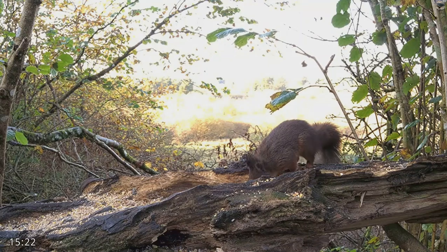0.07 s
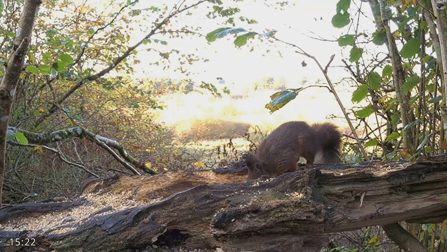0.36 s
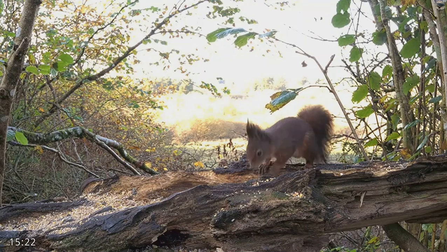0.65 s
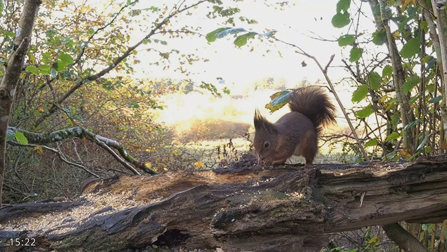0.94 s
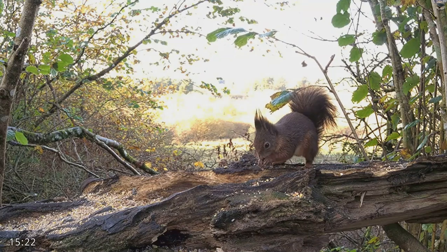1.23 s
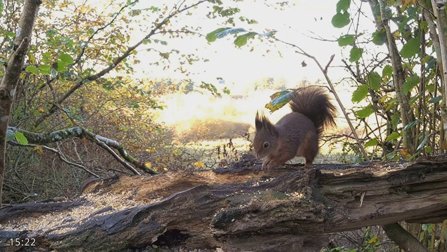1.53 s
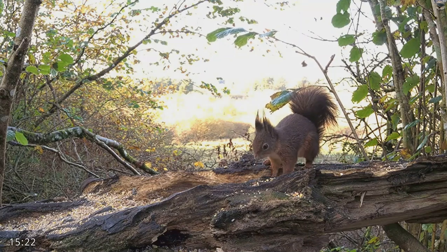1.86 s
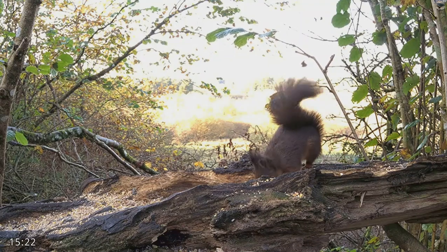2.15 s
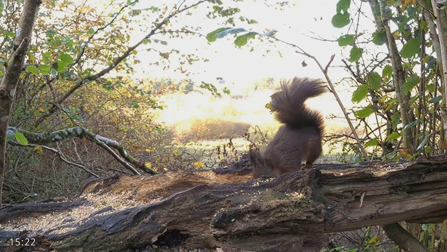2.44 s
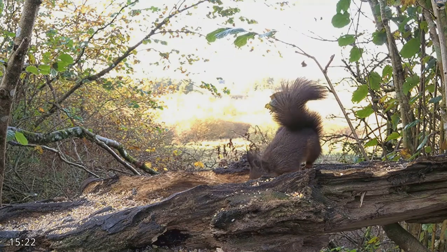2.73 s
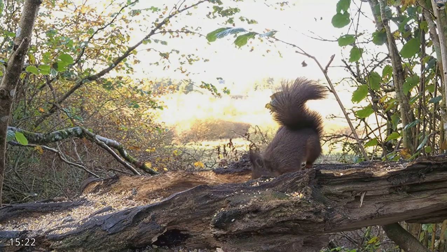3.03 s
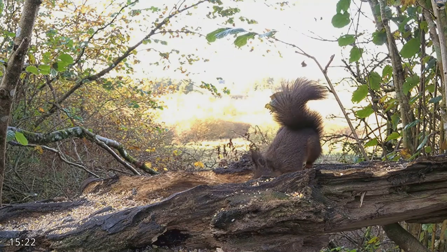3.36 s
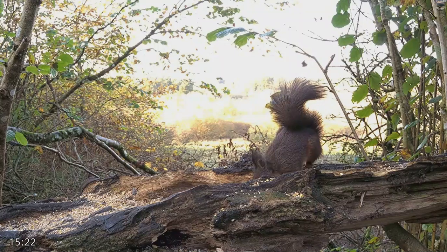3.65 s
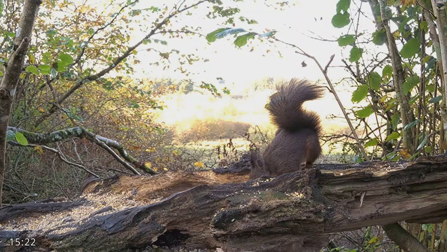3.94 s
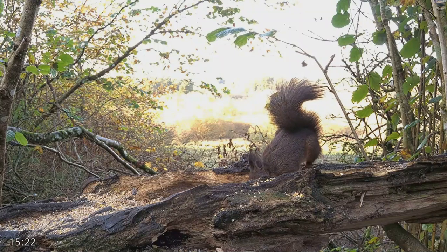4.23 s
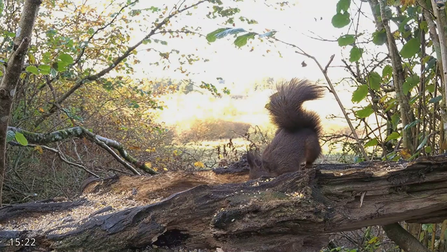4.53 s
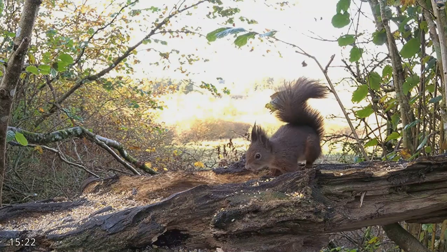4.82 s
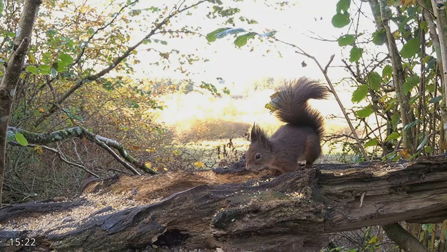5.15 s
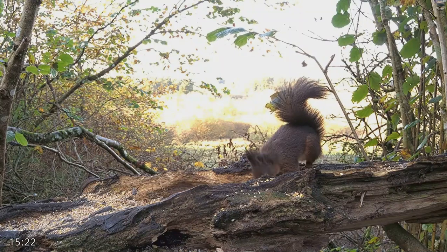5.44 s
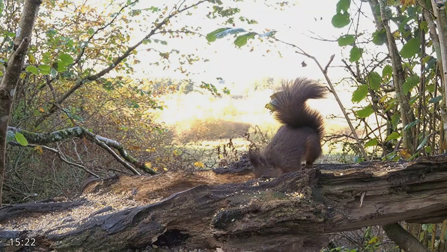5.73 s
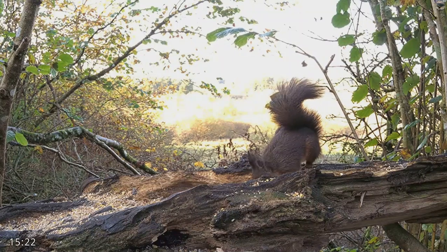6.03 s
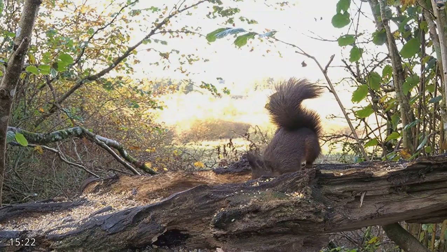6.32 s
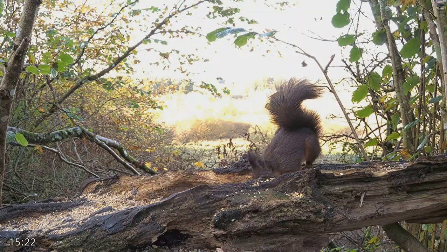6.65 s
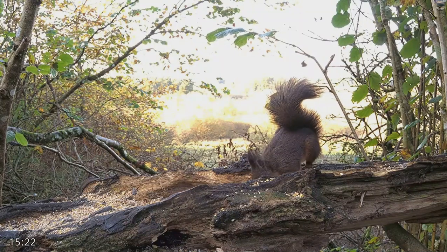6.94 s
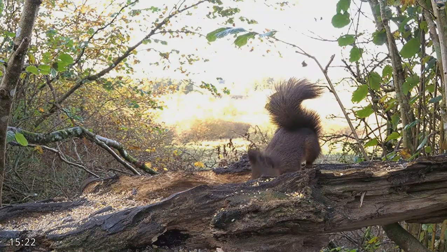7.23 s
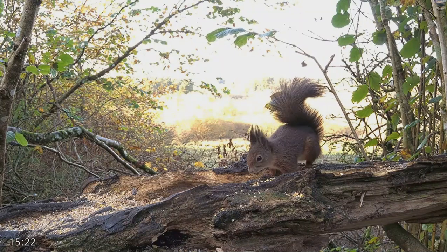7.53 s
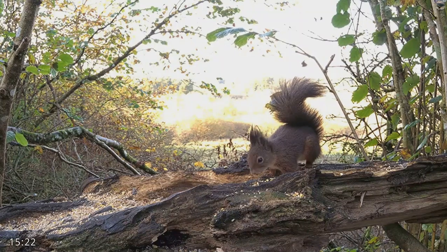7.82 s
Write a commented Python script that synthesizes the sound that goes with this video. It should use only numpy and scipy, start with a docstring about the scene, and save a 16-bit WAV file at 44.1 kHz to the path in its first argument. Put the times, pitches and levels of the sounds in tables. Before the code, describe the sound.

In quiet woodland, a squirrel nibbles seeds on a log, making small, irregular dry cracks and scratches. After about two seconds a small bird flutters in close to the microphone, with quick wingbeats and a sharp wing clap. It gives loud, thin, high chirps that grow fainter and further apart as the cracking continues. Distant birds whistle softly over a faint hiss, hum and low rumble.

```python
"""In quiet woodland, a squirrel cracks seed husks and scratches the bark of a rotten log.
A bird flutters in close, pushing air with each wingbeat, and brakes with a clap of its wings.
It gives thin, high chirps that grow fainter. Other birds whistle far off among the trees.
Mains hum, hiss and a low rumble lie under everything."""
import sys
import numpy as np
from scipy import signal
from scipy.fft import rfft, irfft, next_fast_len
from scipy.io import wavfile
from scipy.ndimage import map_coordinates

SR = 44100
rng = np.random.default_rng(int(sys.argv[2]) if len(sys.argv) > 2 else 0)


def bounce(signal):
    """Save signal as a 16-bit WAV file at the path given by the first command-line argument."""
    frames = np.transpose(np.atleast_2d(signal))
    limited = np.clip(frames, -1, 1)
    pcm = np.round(limited * 32767).astype(np.int16)
    wavfile.write(sys.argv[1], SR, pcm)


N = 347508
TOP_HZ = 15900
TIME = np.arange(N) / SR
AROUND = np.arange(-SR // 20, SR // 20) / SR  # 0.1 s of time, with zero in the middle


def amp(db):
    """Turn decibels into a number to multiply by."""
    return 10 ** (np.asarray(db) / 20)

def unit(x):
    """Scale a sound to an average (rms) strength of 1."""
    return x / np.sqrt(np.mean(x ** 2) + 1e-20)

def wobble(rate, size=N):
    """A smooth random curve that passes through `rate` new values a second."""
    points = rng.standard_normal(int(size * rate / SR) + 4)
    return map_coordinates(points, [np.arange(size) * rate / SR])

def curve(points):
    """Join (time, value) points with straight lines."""
    return np.interp(TIME, *np.transpose(points))

def swells(rows):
    """Smooth rises and falls in loudness, one for each (time, level, half length)."""
    return sum(amp(db) * np.exp(-((TIME - s) / length) ** 2) for s, db, length in rows)

def coloured(x, points):
    """Turn the lows and highs of a sound up or down along (frequency, level) points."""
    size = next_fast_len(N + 8192)
    hz, db = np.transpose(points)
    gain = amp(np.interp(np.log(np.fft.rfftfreq(size, 1 / SR) + 1), np.log(hz), db))
    return irfft(rfft(x, size) * gain, size)[:N]

def noise(points):
    """Noise of strength 1 with the given tone colour."""
    return unit(coloured(rng.standard_normal(N), points))

def grains(colour, per_s, spread_db, t60):
    """A shower of tiny random ticks. Here and below, t60 is the seconds taken to fade by 60 dB."""
    count = int(per_s * N / SR)
    when, pitch = rng.random((2, count, 1))
    k = np.arange(SR // 400)
    sizes = amp(spread_db * rng.standard_normal((count, 1)))
    ticks = sizes * amp(-60 * k / SR / t60) * np.sin(2 * np.pi * TOP_HZ * pitch * k / SR)
    places = (when * N).astype(int) + k
    return unit(coloured(np.bincount(places.ravel(), ticks.ravel(), N)[:N], colour))

def burst(shape, db):
    """Give a short sound as much energy as 0.01 s of steady sound at this level."""
    return amp(db) * shape * np.sqrt(0.01 * SR / np.sum(shape ** 2))

def add(track, s, sound):
    """Mix a sound into the track, starting at s seconds."""
    part = track[max(round(s * SR), 0):][:len(sound)]
    part += sound[:len(part)]

def echoes(x, t60, onset_s=0.00035):
    """Trunks and leaves bounce a sound back as a fading blur."""
    t = np.arange(SR) / SR
    tail = rng.standard_normal(SR) * amp(-60 * t / t60) * (1 - np.exp(-t / onset_s))
    return signal.fftconvolve(x, tail / np.linalg.norm(tail))[:N]


# The tones in the hum: (multiple of the mains frequency, level [dB])
HUM_TONES = [(1, -66), (2, -79.5), (3, -55), (4, -76.5), (5, -67.5), (7, -77.5), (9, -81), (17, -80.5),
             (19, -83), (23, -81), (25, -78), (27, -80), (37, -82)]
# Tone colours of the hiss and the rumble: (frequency [Hz], relative level [dB])
AIR_COLOUR = [(250, -29), (400, -16.5), (580, -6.5), (800, 0), (1030, -11.5), (1300, -3.5), (1900, 0.5),
              (2700, -3.5), (3700, -0.5), (5400, -14), (8000, -7), (11500, -8), (14000, -12.5),
              (15800, -21.5)]
RUMBLE_COLOUR = [(20, -5), (70, -2.5), (110, -3), (200, 2.5), (290, -4.5), (420, -13.5), (700, -32)]
def background(mains_hz=50.02, air_db=-61, rumble_db=-65):
    """Steady electrical hum, the hiss of the open air and a distant rumble."""
    phase = 2 * np.pi * mains_hz * TIME
    hum = sum(np.sqrt(2) * amp(db) * np.sin(k * phase + 2 * np.pi * rng.random()) for k, db in HUM_TONES)
    hiss = amp(air_db + 0.36 * wobble(3.2)) * noise(AIR_COLOUR)
    rumble = amp(rumble_db + 0.604 * wobble(2.2)) * noise(RUMBLE_COLOUR)
    return hum + hiss + rumble


def whistles(notes, trill_hz=75):
    """Thin sliding notes that swell, waver and fade; the higher they are, the more they trill."""
    out = np.zeros(N)
    for s, length, start_hz, end_hz, db in notes:
        u = np.linspace(0, 1, int(length * SR))  # 0 at the start of the note, 1 at its end
        trill = 0.031 * (start_hz / 9000) ** 4 * np.sin(2 * np.pi * trill_hz * length * u)
        pitch = (start_hz + (end_hz - start_hz) * u) * (1 + trill + 0.008 * wobble(201, len(u)))
        gain = amp(db + 1.5 * wobble(100, len(u))) * np.abs(np.sin(np.pi * u)) ** 0.59
        add(out, s, gain * np.sin(2 * np.pi * np.cumsum(pitch) / SR))
    return out

# Single calls: (time [s], length [s], start pitch [Hz], end pitch [Hz], relative level [dB])
FAR_CALLS = [(0.02, 0.086, 4070, 3570, -58.5), (4.195, 0.03, 2570, 2260, -57),
             (4.42, 0.048, 3100, 3070, -58), (4.717, 0.065, 9130, 8300, -48),
             (5.88, .077, 7820, 9140, -51.5), (7.64, 0.076, 9140, 8400, -53.5)]
def far_calls():
    """The calls of far birds arrive mostly as echoes from the trees."""
    calls = whistles(FAR_CALLS)
    return amp(-9) * calls + echoes(calls, t60=0.42, onset_s=0.0037)

# Phrases of song: (time [s], first pitch [Hz], relative level [dB])
FAR_PHRASES = [(3.039, 4120, -53), (5.249, 4310, -59), (7.165, 4305, -59)]
def far_song(note_s=0.096, spacing_s=0.2, sag_hz=61, step_hz=85.6, step_db=3):
    """A far bird sings three notes, each lower and softer than the last; they linger in the trees."""
    song = whistles((s + k * spacing_s, note_s, hz - k * step_hz, hz - k * step_hz - sag_hz,
                     db - k * step_db) for s, hz, db in FAR_PHRASES for k in range(3))
    return amp(-2.5) * song + amp(-4) * echoes(song, t60=0.56, onset_s=0.004)


# The squirrel shifting its weight: (time [s], level [dB])
SHUFFLE_LEVELS = [(0, -81), (1.0, -77), (1.1, -63.5), (1.3, -65), (1.45, -78), (2.0, -75), (2.4, -64),
                  (3.2, -80.5), (7.88, -100)]
# Tone colour of the log: (frequency [Hz], relative level [dB])
LOG_COLOUR = [(70, -30), (130, -7.5), (210, 4), (300, -7), (500, -23), (1000, -60)]
def shuffle():
    """Soft, hollow bumps from the log under the squirrel's feet."""
    return amp(curve(SHUFFLE_LEVELS) + 2.6 * wobble(25)) * noise(LOG_COLOUR)

# Spells of rummaging: (time [s], level [dB], half length [s])
RUMMAGE_SPELLS = [(.42, -69, .06), (1.25, -66.5, 0.15), (2.15, -64.5, .45), (5.05, -77, 0.18),
                  (7.48, -67, 0.064)]
# Tone colour of bark crumbs: (frequency [Hz], relative level [dB])
CRUMB_COLOUR = [(600, -14), (1300, -5.5), (1900, 0), (2700, -3), (3600, 3.5), (5500, -4), (8500, -3.5),
                (12500, -6.5), (16000, -14.5)]
def rummage(idle_db=-71):
    """Paws and nose stir crumbs of bark: tiny ticks of very uneven size."""
    ticks = grains(CRUMB_COLOUR, per_s=1500, spread_db=4.5, t60=0.0044)
    return (amp(idle_db) + swells(RUMMAGE_SPELLS)) * ticks

# Claw strokes: (time [s], level [dB], half length [s])
CLAW_STROKES = [(0.383, -64, 0.022), (4.902, -57.5, 0.04), (6.51, -60, 0.04), (7.405, -59, 0.017),
                (7.495, -59.5, 0.0096)]
# Bright tone colour of scrapes and of snapping husks: (frequency [Hz], relative level [dB])
SNAP_COLOUR = [(3000, -11), (5000, -15), (6500, 1.5), (8500, 6), (10000, -2), (11500, -15), (16000, -26)]
def scrapes(grit_db=4):
    """Claws drag over bark in brief, gritty swells."""
    return swells(CLAW_STROKES) * unit(noise(SNAP_COLOUR) * amp(grit_db * wobble(450)))

# Spells of gnawing: (time [s], length [s], bite rate [1/s], relative level [dB])
GNAW_SPELLS = [(1.04, 0.68, 13.2, -67), (1.831, 0.61, 11.6, -73), (5.07, 0.35, 16, -70)]
def gnawing(spread_db=3, unevenness=0.25, husk_hz=3600):
    """List light, dull bites in loosely regular runs, as extra rows for cracks()."""
    bites = []
    balance_db = np.array([0, 3, -4, -4])  # knock, ring, snap, click
    for start, length, rate, db in GNAW_SPELLS:
        for s in start + np.arange(0, length, 1 / rate):
            late, sharp = rng.standard_normal(2)
            levels = db + balance_db + spread_db * rng.standard_normal(4)
            bites.append((s + unevenness * late / rate, *levels, husk_hz * np.exp(0.09 * sharp)))
    return bites

# The tones of a husk: (multiple of its pitch, relative level [dB], time to fade by 60 dB [s])
HUSK_TONES = [(1, -3, 0.01), (1.22, -17, 0.004)]
def husk_ring(hz, t, attack_s=0.00018, roughness=0.48):
    """The dry, unsteady ring of a splitting husk."""
    tones = 0
    for ratio, db, t60 in HUSK_TONES:
        phase = 2 * np.pi * hz * ratio * t + roughness * wobble(2250, len(t))
        tones += amp(db - 60 * t / t60) * np.sin(phase)
    return tones * (1 - np.exp(-(t / attack_s) ** 2))

# Husks cracking and claws on bark, with the relative level of each part:
# (time [s], wood knock [dB], husk ring [dB], snap [dB], tooth click [dB], husk pitch [Hz])
HUSK_CRACKS = [(0.4298, -74, -51, -58, -51, 3704), (0.4357, -72, -53, -55, -63, 4260),
               (0.5491, -66.0, -77, -72.0, -66, 3290), (0.7397, -62.5, -57, -65, -72.0, 4370),
               (1.0266, -55, -63, -68, -74.5, 3320), (1.2866, -67, -56, -55, -68, 3550),
               (1.2919, -72, -50, -56, -67, 3770), (1.3215, -69, -57, -67.0, -62.5, 3350),
               (1.6546, -70, -74, -72, -58.5, 3620), (1.7541, -71, -53, -60.5, -67.0, 3880),
               (1.7719, -72.5, -50.5, -64, -73.0, 3900), (1.791, -57.5, -55, -57, -62, 4280),
               (1.9016, -52, -55, -69, -63.0, 3400), (1.9361, -69, -55.5, -57, -58, 3300),
               (1.9685, -64.0, -54, -56, -64, 4200), (1.9735, -70, -55.5, -68, -74.0, 4030),
               (2.0128, -77, -64, -59, -64, 4310), (2.0943, -72.5, -58, -56, -69, 3170),
               (2.1331, -60, -48.5, -51, -71, 4250), (2.1845, -68.0, -64, -62, -71.0, 3620),
               (3.585, -71.5, -63.5, -56, -63.5, 4420), (3.8474, -59, -55, -50, -66.5, 3260),
               (3.9799, -79, -55, -52, -55, 4266), (4.039, -70, -55.5, -71, -57, 3520),
               (4.2152, -72.5, -61, -50.5, -68, 4330), (4.2763, -75, -59, -59, -64.5, 3750),
               (4.321, -75, -61, -50.5, -55, 4600), (4.4162, -68, -75, -55.5, -70.0, 4100),
               (4.6933, -63, -61, -65, -72.5, 4670), (4.7451, -62, -56, -63, -73.0, 4400),
               (4.8016, -65.0, -53, -58, -63.0, 4530), (4.8605, -62, -56, -72.5, -69.5, 4540),
               (4.875, -54.5, -58, -56, -62.0, 3200), (4.9418, -74.5, -56.5, -59, -47.5, 3520),
               (5.0253, -68.5, -74, -64, -51.5, 3400), (5.0473, -67, -67, -66, -57.5, 3440),
               (5.0506, -63, -47, -59, -57, 3500), (5.1053, -68.5, -56, -61.5, -70, 3460),
               (5.1327, -59, -56.5, -67, -69.5, 3550), (5.1432, -63, -57, -62, -73.5, 3380),
               (5.1723, -73.0, -72.5, -73.0, -61, 3240), (5.1901, -75, -56.5, -69, -65, 3660),
               (5.2711, -70, -61, -68, -53.0, 3290), (5.2739, -59.0, -51.5, -74, -70, 3510),
               (5.3787, -62, -63, -60, -60.0, 3470), (5.4036, -60, -57.5, -72.5, -66, 3450),
               (5.4152, -72.5, -66, -70, -62.5, 3700), (5.814, -65, -55, -46.5, -61.0, 4310),
               (5.8787, -73.5, -53.5, -58.5, -72.5, 4580), (5.9672, -67, -55, -58, -73.0, 4480),
               (6.1782, -56, -57, -67.5, -76.0, 3640), (6.2344, -72, -61, -64.5, -76.5, 4350),
               (6.4656, -66.0, -59, -50, -53, 4630), (6.5372, -72.5, -64.5, -49.5, -56, 4550),
               (6.5975, -59, -60, -49.5, -57, 4630), (6.8644, -64, -68.0, -48, -57, 4630),
               (6.8968, -69, -74.5, -60, -58, 3010), (6.9872, -67, -53.5, -64, -71, 3340),
               (7.0566, -68, -43.5, -69, -67.5, 3486), (7.309, -64.5, -57.5, -75.0, -75.0, 3340),
               (7.3925, -61.5, -62, -49.5, -58.5, 4280), (7.4196, -78, -75.0, -53, -53, 4220),
               (7.4243, -72.5, -60, -60, -59, 4260), (7.4688, -52.5, -62, -65.0, -54, 3400),
               (7.5, -64, -57.5, -65, -66.5, 3710)]
# Tone colours of the knock and the click: (frequency [Hz], relative level [dB])
WOOD_COLOUR = [(500, -28), (1000, -13), (1400, -13), (2000, 5.5), (2600, -7), (3500, -27)]
TOOTH_COLOUR = [(7000, -33), (9500, -2), (10600, 2), (12300, 0.5), (13500, -16), (16000, -14.5)]
def cracks(attack_s=0.00063, creak_s=0.002, crumble_t60=0.098):
    """A husk creaks under the teeth, splits with a click, snap and ring, knocks the wood and crumbles."""
    out = np.zeros(N)
    t = np.arange(SR // 25) / SR
    wood, snap, teeth = noise(WOOD_COLOUR), noise(SNAP_COLOUR), noise(TOOTH_COLOUR)
    for s, knock_db, ring_db, snap_db, click_db, hz in list(HUSK_CRACKS) + gnawing():
        crumbs = amp(-26 - 60 * t / crumble_t60 + 5 * wobble(500, len(t)))
        add(out, s, burst(husk_ring(hz, t), ring_db + 0.4))
        creak = np.sin(2 * np.pi * hz * t + wobble(3000, len(t))) * np.exp(-t[::-1] / creak_s)
        add(out, s - t[-1], burst(creak, ring_db - 8))  # ends just as the husk splits
        parts = (wood, knock_db - 1, 0.012), (snap, snap_db, 0.008), (teeth, click_db - 1, 0.006)
        for source, db, t60 in parts:
            fade = (amp(-60 * t / t60) + crumbs) * (1 - np.exp(-t / attack_s))
            add(out, s, burst(source[round(s * SR):][:len(t)] * fade, db))
    return out

def splinters(count=3, scatter_s=0.013, t60=0.0026):
    """After each listed crack, a few splinters break away with tiny dry ticks."""
    out = np.zeros(N)
    t = np.arange(SR // 100) / SR
    for s, _, ring_db, _, _, hz in HUSK_CRACKS:
        for late, hard, sharp in rng.standard_normal((count, 3)):
            tick = np.sin(2 * np.pi * hz * np.exp(0.18 * sharp) * t) * t * amp(-60 * t / t60)
            add(out, s + 0.0033 + scatter_s * abs(late), burst(tick, ring_db - 17 + 3 * hard))
    return out


def shove(hz, width_s, glide=16, roughness=0.35):
    """A shove of air rises in pitch as the wing gathers speed, and dies more slowly than it comes."""
    width = width_s * np.where(AROUND < 0, 0.7, 1.25)
    phase = 2 * np.pi * hz * AROUND * (1 + glide * AROUND) + roughness * wobble(250, len(AROUND))
    return np.sin(phase) * np.exp(-(AROUND / width) ** 2)

PUFF_LAG_S = 0.009  # after the thump
# The bird flies in, brakes and settles: (time [s], thump [dB], puff [dB], feather swish [dB])
WINGBEATS = [(2.356, -70, -64, -55), (2.395, -53, -55, -55), (2.443, -50, -47, -44), (2.490, -51, -41, -42),
             (2.535, -46, -35, -42), (2.580, -46, -36, -42), (2.628, -41, -38, -44), (2.675, -37, -38, -44),
             (2.723, -37, -46, -53), (2.770, -40, -56, -54), (2.817, -42, -50, -53), (2.865, -44, -53, -56),
             (2.910, -47, -58, -59), (2.958, -46.5, -60, -60), (3.006, -47, -57, -62),
             (3.053, -48, -58, -67), (3.098, -51, -63, -70), (3.148, -54, -66, -70)]
def downstrokes():
    """Each downstroke of the wings makes a low thump, then a hollow puff."""
    out = np.zeros(N)
    for s, thump_db, puff_db, _ in WINGBEATS:
        add(out, s + AROUND[0], amp(thump_db) * shove(hz=225, width_s=0.0055))
        add(out, s + AROUND[0] + PUFF_LAG_S, amp(puff_db) * shove(hz=500, width_s=0.0046))
    return out

# Tone colour of swirling air: (frequency [Hz], relative level [dB])
SWIRL_COLOUR = [(50, -26), (110, -3), (220, 4), (380, -6), (560, -13), (800, -9), (1200, -30)]
def swirls(width_s=0.011):
    """Air swirls off the wings in a short, low rush after each thump."""
    gain = swells((s + PUFF_LAG_S, thump_db - 11, width_s) for s, thump_db, _, _ in WINGBEATS)
    return gain * noise(SWIRL_COLOUR)

# Air rushing through the spread feathers: (time [s], level [dB])
RUSH_LEVELS = [(2.25, -92), (2.38, -61), (2.55, -55.5), (2.72, -51), (2.9, -58), (3.05, -63.5), (3.25, -73)]
# Tone colour of feathers: (frequency [Hz], relative level [dB])
FEATHER_COLOUR = [(250, -13), (550, -0.5), (950, -9), (1700, -4), (2600, -9.5), (3700, 0.5), (5500, -11.5),
                  (10000, -5.5), (15000, -24)]
def feathers(lag_s=0.0089, width_s=0.011):
    """Feathers hiss in the rushing air, and swish and rub on every beat."""
    gain = amp(curve(RUSH_LEVELS))
    for s, _, _, db in WINGBEATS:
        add(gain, s + AROUND[0] + lag_s, amp(db) / np.cosh(2 * AROUND / width_s) ** 0.73)
    rustle = grains(FEATHER_COLOUR, per_s=3000, spread_db=5.5, t60=0.003)
    hiss = noise(FEATHER_COLOUR) * amp(2.5 * wobble(400))
    return gain * unit(hiss + amp(2) * rustle)

# The whirr drops as the bird slows: (time [s], level [dB], pitch [Hz])
WHIRR_PATH = [(2.3, -84, 1850), (2.365, -61.5, 1793), (2.42, -55, 1755), (2.51, -56, 1712),
              (2.6, -55.5, 1560), (2.7, -51, 1450), (2.78, -75, 1399)]
def whirr(width_hz=700, pulse_db=3.5, lag_s=0.015):
    """An almost whistling rush through the flight feathers that swells with every beat."""
    s, db, hz = np.transpose(WHIRR_PATH)
    phase = 2 * np.pi * np.cumsum(np.interp(TIME, s, hz)) / SR
    rush = unit(wobble(width_hz) * np.sin(phase) + wobble(width_hz) * np.cos(phase))
    beats_done = np.interp(TIME - lag_s, np.transpose(WINGBEATS)[0], np.arange(len(WINGBEATS)))
    level = np.interp(TIME, s, db) + pulse_db * np.cos(2 * np.pi * beats_done)
    return amp(level) * rush * (TIME > s[0]) * (TIME < s[-1])

# Wing tips and feet striking: (time [s], level [dB], half length [s])
STRIKES = [(2.451, -49, 0.0017), (2.5, -45.5, 0.0028), (2.588, -41.5, 0.0018), (2.684, -31, 0.0021),
           (2.732, -38.5, 0.0027), (2.866, -50.5, .003), (2.888, -46, 0.0026), (2.898, -46.5, 0.0043)]
# Their tone colour: (frequency [Hz], relative level [dB])
CLAP_COLOUR = [(200, -9.5), (500, -9.5), (900, -8), (1500, 2), (3500, -4), (6000, -7.5), (10500, -4),
               (15000, -26.5)]
def claps():
    """Wing tips and feet strike with sharp slaps as the bird brakes."""
    return swells(STRIKES) * noise(CLAP_COLOUR)


# More of each chirp comes by way of the trees as the bird moves off: (time [s], echo boost [dB])
ECHO_BOOST = [(2.6, 0.5), (2.95, 2.5), (3.16, 13.5), (3.451, 12.5), (4.03, 16), (4.6, 13), (5.35, 11.5),
              (6.099, 11)]
# Tone colour of echoes from leaves: (frequency [Hz], relative level [dB])
LEAF_COLOUR = [(3500, -10.5), (6500, -11), (7800, -4), (9000, -3.5), (12000, -2.5)]
def chirp_echoes(voice):
    """The trees return the chirps as a short echo and a longer, fainter one."""
    sent = coloured(voice * amp(curve(ECHO_BOOST)), LEAF_COLOUR)
    return amp(-9.5) * echoes(sent, t60=0.13, onset_s=0.0027) + amp(-20.5) * echoes(sent, t60=0.49)

# A quick fall and a slower rise: (share of the length, share of the swoop, level change [dB])
CHIRP_SHAPE = [(0, 0.77, -1), (.15, 0.36, -1), (.3, 0.068, 5), (.38, 0.0047, 5.5), (.56, .36, -1.5),
               (.74, .53, 2.5), (.9, .84, -3.5), (1, 0.99, -6)]
# The near bird's chirps: (time [s], length [s], pitch in the dip [Hz], swoop [Hz], relative level [dB],
# swell to the end [dB], softening in the dip [dB], opening slide [s], warble [Hz],
# low voice's relative level [dB], low voice's swoop as a multiple of the main one)
NEAR_CHIRPS = [(2.571, 0.05, 8220, 697, -18, 8, 2.5, .014, 190, -45, 2),
               (2.771, 0.04, 7695, 1271, -14, 3.5, 5.5, 0.011, -3.5, -45, 1.9),
               (2.9376, 0.051, 7450, 1607, -19, -3, 17.5, 0.0083, -10, -52, 1.6),
               (3.139, 0.053, 7310, 1363, -34, 6, 4, .002, 8.5, -58, 0.96),
               (3.418, 0.06, 6765, 1807, -36.5, -2, 5.5, .001, -9.5, -52, 0.68),
               (4.003, 0.066, 6640, 1446, -48, -4, 5, .005, -3, -60, 1.0),
               (4.564, 0.066, 6510, 1800, -46, -0.5, 3, .001, 1, -59.5, 0.87),
               (5.307, 0.074, 6330, 1740, -47.5, 0, 8, .002, 0, -64, 0.95),
               (6.051, 0.07, 6110, 1675, -48, -5, 15, .001, 4, -64, 0.79)]
def chirps(warble_rate_hz=43, slide_hz=1175, usual_slide_s=0.0083, attack_s=0.0037, release_s=0.0034):
    """Each chirp dips and rises; a weak voice near half its pitch mixes with it to add a tone above."""
    out = np.zeros(N)
    share, rise, shape_db = np.transpose(CHIRP_SHAPE)
    for (s, length, dip_hz, swoop_hz, db, swell_db, soften_db, slide_s,
         warble_hz, low_db, low_swoop) in NEAR_CHIRPS:
        t = np.arange(-slide_s, length + release_s / 2, 1 / SR)
        n = len(t)
        u = np.clip(t / length, 0, 1)
        slide = np.clip(-t / max(slide_s, usual_slide_s), 0, 1) ** 2
        warble = warble_hz * np.cos(2 * np.pi * warble_rate_hz * t)
        pitch = dip_hz + swoop_hz * np.interp(u, share, rise) + warble - 3 * warble_hz * (1 - u) ** 4
        pitch -= slide_hz * slide * np.sqrt(slide_s / usual_slide_s)  # a longer slide starts lower
        pitch *= 1 + 0.0065 * wobble(900, n)
        phase = 2 * np.pi * np.cumsum(pitch) / SR
        level = db + np.interp(u, share, shape_db) + swell_db * (u - 0.5) - 0.5 * slide
        level -= soften_db * np.exp(-((u - 0.36) / 0.17) ** 2)
        level += 0.0292 * warble + 1.8 * wobble(400, n)
        rasp = amp(-29) * wobble(4500, n) * np.cos(phase)
        main = amp(level) * (np.sin(phase) + rasp + amp(-44) * np.sin(2 * phase))

        low_hz = max(dip_hz / 2, 3200) * (pitch / dip_hz) ** low_swoop
        low_phase = 2 * np.pi * np.cumsum(low_hz) / SR
        low = amp(low_db + 1 + 3 * wobble(250, n)) * np.sin(low_phase + 0.3 * wobble(500, n))
        high_gain = amp(-33 + 0.63 * level + 3 * wobble(400, n))
        high = high_gain * np.sin(2 * phase - low_phase + 0.73 * wobble(1500, n))
        in_dip = np.minimum(dip_hz / pitch, 1) ** 6  # favours both side tones in the dip
        ramp = np.clip(np.minimum((t - t[0]) / attack_s, (t[-1] - t) / release_s), 0, 1)
        fade = np.sin(np.pi / 2 * ramp) ** 2
        add(out, s + t[0], np.sqrt(2) * fade * (main + np.sqrt(in_dip) * low + in_dip * high))
    return out


def scene():
    """Mix the near bird and the squirrel, echoing off log, bushes and trees, with the woodland behind."""
    voice = chirps()
    voice += chirp_echoes(voice)
    wings = downstrokes() + feathers() + swirls() + whirr() + claps()
    wings += amp(-16.5) * echoes(wings, t60=0.23)
    feeding = cracks() + splinters() + scrapes() + rummage()
    feeding += amp(-8) * echoes(feeding, t60=0.071)
    return (voice + wings + feeding + shuffle() + far_calls() + far_song() + background())[None]

def record(dry):
    """Cut away all treble above TOP_HZ."""
    return irfft(rfft(dry) * (np.fft.rfftfreq(N, 1 / SR) < TOP_HZ), N)


dry = scene()
out = record(dry)
bounce(out)
```